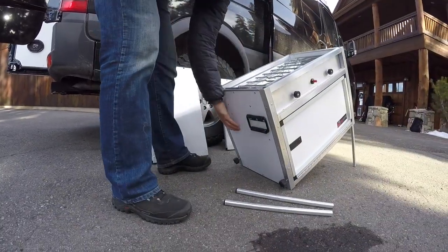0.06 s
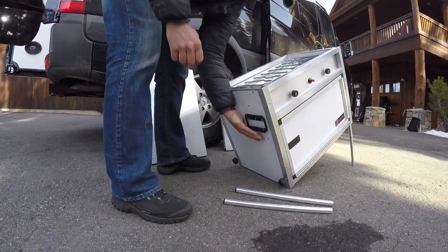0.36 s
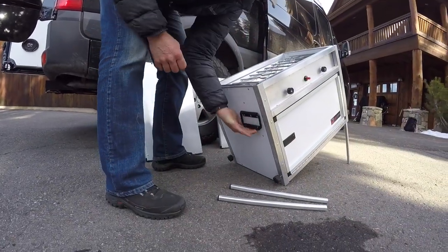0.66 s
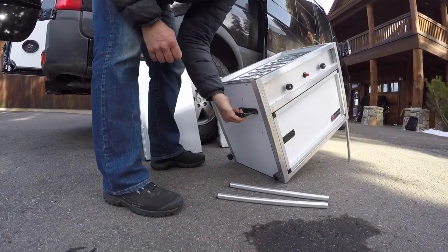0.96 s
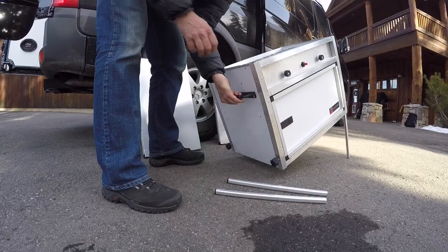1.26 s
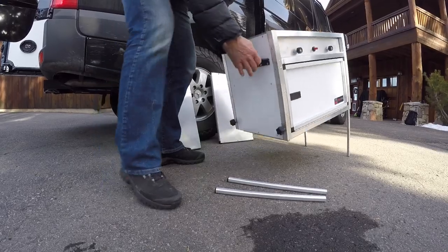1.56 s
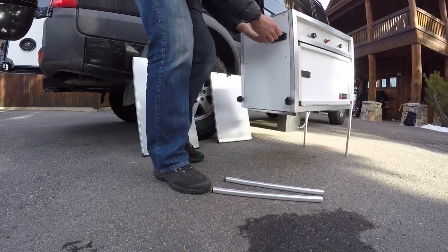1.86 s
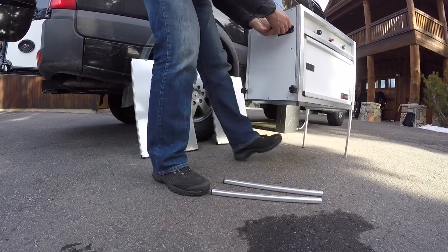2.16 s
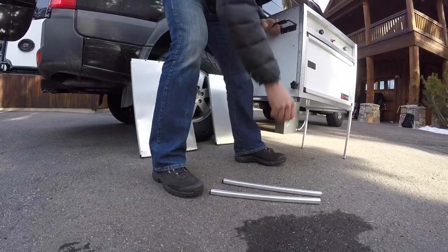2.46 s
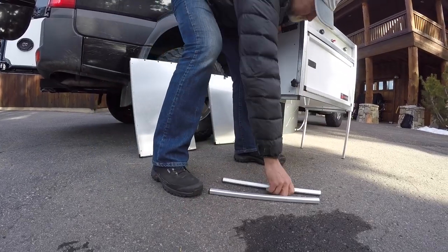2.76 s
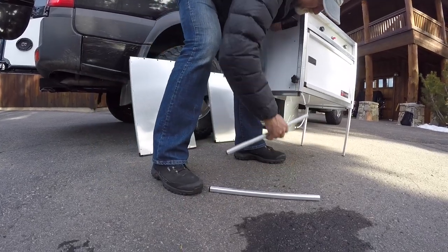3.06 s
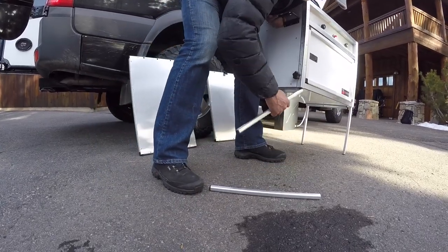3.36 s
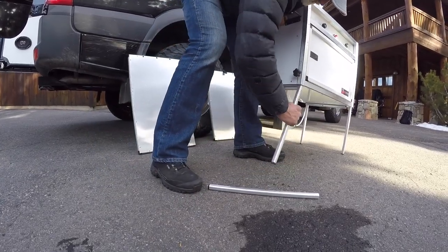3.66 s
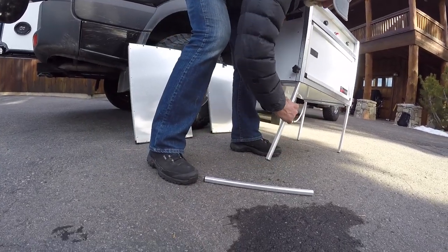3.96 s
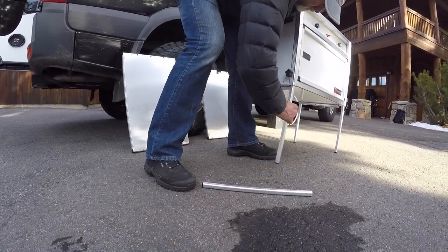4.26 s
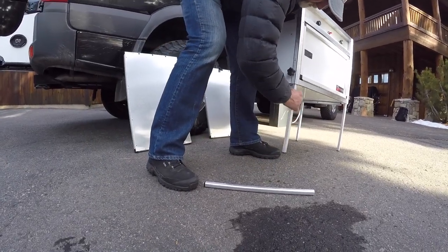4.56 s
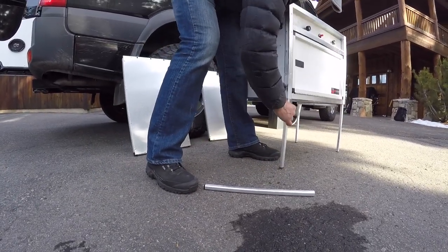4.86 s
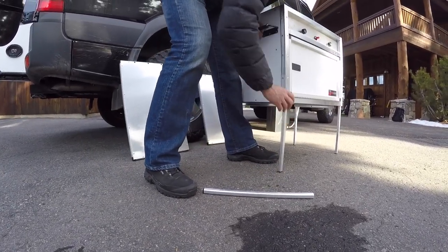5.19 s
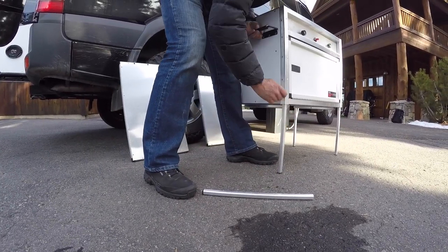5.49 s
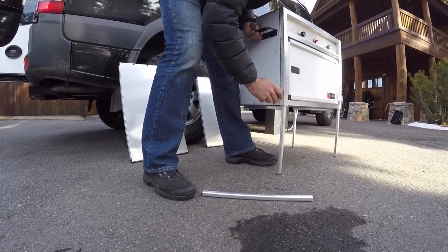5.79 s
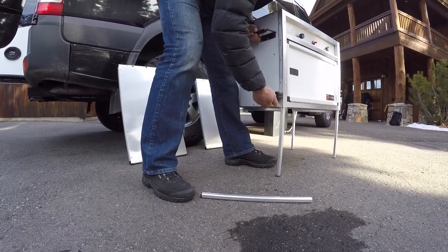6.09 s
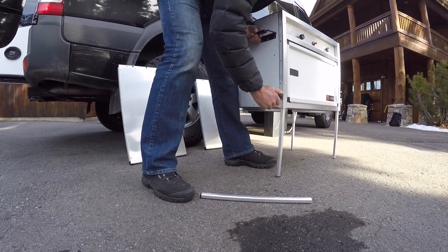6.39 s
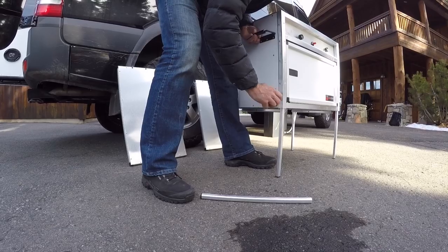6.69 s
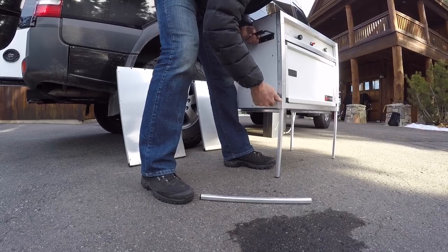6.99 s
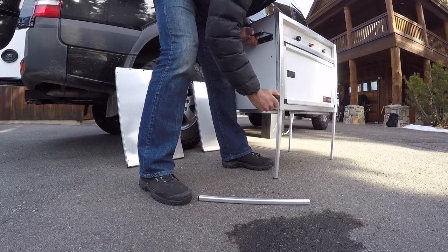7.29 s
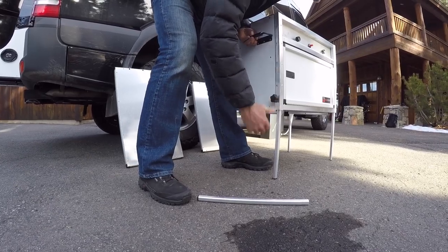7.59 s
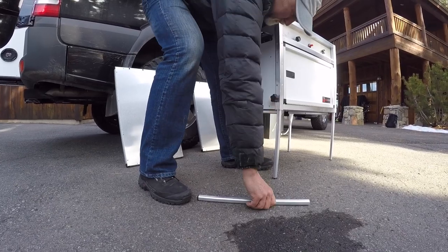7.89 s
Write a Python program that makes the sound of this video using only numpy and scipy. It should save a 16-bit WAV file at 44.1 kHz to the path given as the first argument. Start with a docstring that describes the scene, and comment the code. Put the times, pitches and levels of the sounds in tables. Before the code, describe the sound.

Light wind and the soft swish of a padded jacket run under close metal handling in a paved yard. A hollow metal box knocks, boots step, and an aluminium leg clinks. The leg strikes its socket with a bright clank, then rattles and scrapes in before juddering down on the ground. Quiet ticking and rubbing follow as it is screwed tight, and a second tube clinks faintly at the end.

```python
"""Propping up a sheet-metal camp kitchen

An aluminium leg is picked up, clanks against the underside, scrapes into its socket, is set down on
the pavement and screwed tight. Each blow or scrape is a chattering force that rings the modes of the
hollow box; tube, socket and legs ring with modes of their own. Boots shift, a padded jacket swishes
as grainy noise, and light wind rumbles. The yard adds a thin tail to the blows."""
import sys
import numpy as np
from scipy import signal
from scipy.fft import rfft, irfft
from scipy.io import wavfile

SR = 44100
rng = np.random.default_rng(int(sys.argv[2]) if len(sys.argv) > 2 else 0)


def pcm_store(signal):
    """Save signal as 16-bit PCM."""
    levels = np.round(np.clip(np.atleast_2d(signal), -1, 1) * 32767)
    wavfile.write(sys.argv[1], SR, levels.astype(np.int16).T)


N = 350154
RING_T_S = np.arange(SR * 3 // 5) / SR
ATTACK_S = .04  # rms window that sets a blow's level
TURN_S = 0.5  # one turn of the wrist

# outdoor air and wind: f/Hz, density/dB
AIR_SPECTRUM = [(12, -27.5), (20, -1), (39, -3), (80, -13), (126, -11.5), (225, -21.5), (333, -27.5),
                (372, -26.5), (416, -33.5), (534, -29), (581, -30.5), (767, -31.5), (906, -41), (1500, -51),
                (15500, -55)]
# yard reverberation: f/Hz, t60/s
YARD_DECAY = [(60, 0.23), (300, 0.46), (1000, 0.52), (4000, 0.21), (12000, 0.22)]
# jacket swish: f/Hz, density/dB
JACKET_SPECTRUM = [(300, -8.5), (900, 0.5), (2000, -0.5), (3500, -0.5), (5500, -6), (8000, -14.5),
                   (12000, -24.5), (16000, -31)]
# sleeve hiss: f/Hz, density/dB
SLEEVE_SPECTRUM = [(2000, -24), (6000, 4), (9000, -0.5), (13000, -1), (16000, -5)]
# arm movements: centre t/s, length/s, level/dB
ARM_MOVES = [(.26, 0.75, -57.5), (1.083, 2.26, -58), (1.538, 0.1, -47.5), (1.848, 0.47, -64.5),
             (2.594, 1.3, -56), (3.57, 0.42, -54.5), (4.35, 2.94, -57), (5.55, 0.14, -58), (6.02, .15, -61),
             (6.456, 0.24, -60), (6.813, 0.38, -62), (7.8, 0.4, -54.5)]
# screw thread friction: f/Hz, density/dB
THREAD_SPECTRUM = [(200, -12), (500, 2.5), (850, 3.5), (1120, 4.5), (1500, -13), (2800, -12.5),
                   (3400, -10.5), (4000, -43), (8000, -56)]
# wrist turns that tighten the leg: centre t/s, level/dB
WRIST_TURNS = [(5.3, -57), (6.1, -63.5), (6.869, -58.5), (7.45, -61.5)]
# boots on pavement: t/s, level/dB, push f/Hz, grit re push/dB
STEPS = [(1.433, -59.5, 200.4, 1), (1.696, -50, 323, -7.5), (1.723, -54.5, 510, 2.5),
         (1.745, -41, 201, -14), (1.779, -64.5, 600, 5), (2.197, -40, 146, -12), (2.846, -37.5, 107, -18),
         (2.869, -39, 90, -24)]
# grit under a sole: f/Hz, density/dB
GRIT_SPECTRUM = [(100, -9), (500, 3), (950, -3), (1400, -21), (2200, -14), (6000, -46)]
# frame slipping on its prop: f/Hz, level/dB, t60/s
SQUEAK_MODES = [(4600, 0, .04), (5700, -2.5, 0.045), (7180, 0, .03), (7900, -1, .025), (10150, -4, .02),
                (11330, -5, .035)]
# close clicks and scratches: t/s, length/s, level/dB
DRY_CLICKS = [(0.513, 0.00083, -40.5), (3.669, 0.0027, -43), (3.6748, 0.00093, -33.5), (3.677, 0.02, -42.5),
              (3.693, 0.027, -48.5), (7.498, 0.0023, -42)]
# their broad resonance: f/Hz, density/dB
CLICK_SPECTRUM = [(500, -21), (2400, -14.5), (3900, -0.5), (5200, -10), (7500, -23.5), (15000, -17)]
# foot juddering on pavement: t/s, level/dB
JUDDERS = [(4.846, -46.5), (4.916, -40), (4.956, -28), (5.051, -47.5), (5.162, -49.5)]
# mounted legs under load: f/Hz, level/dB, t60/s
LOADED_LEG_MODES = [(569, -9, 0.26), (818, 4, 0.11), (910, -1.5, 0.21), (917, 1, 0.13), (1156, -20, .2),
                    (1880, -11, 0.19)]
# taps on a leg tube: t/s, level/dB, favoured f/Hz, grip factor on t60
TUBE_TAPS = [(2.767, -50.5, 2400, 0.87), (2.7739, -40, 2310, 0.27), (2.807, -57, 3600, 0.37),
             (2.878, -63, 2500, .8), (3.2295, -28.5, 3400, 0.32), (3.237, -36, 3425, 0.25),
             (7.878, -60, 2370, 0.39), (7.896, -52.5, 2000, 0.2), (7.904, -53, 6000, 0.67),
             (7.922, -48, 2650, 0.63)]
# tube bending modes: f/Hz, level/dB, t60 before grip/s
TUBE_MODES = [(1828, 0, .19), (3435, 0, .15), (5330, -5, .11), (7720, -13, .09)]
# gritty contact on the tube: f/Hz, density/dB
TUBE_CRACK = [(100, -13.5), (600, 4.5), (2000, -1.5), (5000, -6), (7500, -25.5), (14000, -36)]
# leg rim on socket: t/s, level/dB, favoured f/Hz
RIM_STRIKES = [(3.362, -19, 3700), (3.399, -36, 3000), (3.892, -40, 2850), (4.114, -47.5, 2500),
               (4.16, -47.5, 2600), (4.512, -48, 3800)]
# metal socket: f/Hz, level/dB, t60/s
SOCKET_MODES = [(2306, -4.5, 0.038), (2660, 0, .04), (2820, 0.5, .04), (3180, -14, 0.075), (3430, 1, 0.025),
                (3700, -4, 0.035), (4520, -13, .07), (4700, -8.5, 0.033), (5240, -2.5, 0.045),
                (5500, -3.5, 0.063), (6100, -21.5, .08), (8020, -22, 0.06)]
# hard contact of the rim: f/Hz, density/dB
RIM_CRACK = [(500, -21), (2700, 1), (5500, -3), (9000, -16), (16000, -19.5)]
# main modes of the box: f/Hz, level/dB, t60/s
BOX_MODES = [(47.6, 0.5, 0.2), (73.4, -2, 0.39), (111.44, -1.5, 0.73), (117, -5, 0.27), (166.4, 3, 0.082),
             (180.75, 3.5, 0.44), (265.7, -4, 0.35), (292, -9.5, 0.31), (459, -19.5, 0.21),
             (594, -9.5, 0.31), (620.5, -10, 0.12), (660, -13, .18), (727, -9.5, 0.22), (972.6, 0, 0.11),
             (1030, -10, 0.099), (1089, -6, 0.13), (1215, -9, 0.16), (1340, -11, .1), (1432, -7.5, 0.093),
             (1685, -11, 0.063), (1996, -8, .08)]
# dense panel modes: f/Hz, density/dB
PANEL_SPECTRUM = [(30, 6), (110, 8.5), (175, 9), (225, 3), (280, 4), (350, -3.5), (450, -6), (620, 3),
                  (1100, -1.5), (2000, -3), (3200, -5.5), (5000, -14), (7500, -20), (16000, -38.5)]
# their decay: f/Hz, t60/s
PANEL_DECAY = [(40, 0.37), (200, .3), (500, 0.16), (1200, 0.079), (3000, 0.061), (7000, 0.04),
               (15000, 0.021)]
# near-field peak and dips of the box: f/Hz, width/Hz, gain/dB
NEAR_FIELD_BANDS = [(174, 41, 2.5), (206, 34, -6), (383.6, 69, -2.5)]
# box registers (thump, boom, clang, clank, sizzle): low f/Hz, high f/Hz
REGISTERS = [(30, 100), (100, 380), (380, 1400), (1400, 6000), (6000, 15000)]
# handle, latch and thread ticks: t/s, level/dB, hardness (clank re clang)/dB
TICKS = [(.145, -70.5, 22), (.221, -57.5, -10.5), (0.688, -62, 16), (.777, -54.5, -3), (.806, -58, 2),
         (.845, -53, 2), (.859, -50.5, -6), (5.297, -61.5, -11), (5.365, -57.5, -9), (6.056, -59, -5.5),
         (6.19, -64, -14), (6.211, -62, -7), (6.44, -64, -5), (6.883, -59.5, -12), (6.916, -61, -2),
         (7.373, -66, 5)]
# metal dragged on metal or pavement: t/s, length/s, level/dB, hardness/dB, weight/dB, favoured f/Hz
SCRAPES = [(4.123, .028, -42, -16.5, 3, 700), (4.172, 0.021, -45, -21, 0, 940),
           (4.449, .026, -41.5, 4.5, 8, 620), (4.475, .034, -35, -4.5, 0, 166),
           (4.586, 0.047, -57.5, 0, 7, 1300), (4.926, 0.028, -34.5, -9.5, 6.5, 170),
           (4.976, 0.083, -48, 0, 1, 905)]
# blows on the box: t/s, contact/s, level/dB, hardness/dB, weight/dB, favoured f/Hz
KNOCKS = [(0.5523, 0.004, -34.5, -8, -32, 1040), (.874, 0.004, -35, -3, 0, 42),
          (0.926, .002, -46, -13.5, 15, 42), (1.001, .006, -43.5, -12, 14.5, 644),
          (1.017, .0055, -33.5, -5, 5.5, 48), (2.04, 0.0051, -37.5, -11.5, -8, 860),
          (2.064, .0064, -47, -6, -9, 617), (3.229, .02, -32, -9.5, -16, 1160),
          (3.361, 0.0032, -35.5, 9.5, -12, 267), (3.393, 0.0041, -36, 6.5, -2.5, 1260),
          (3.399, 0.0032, -38, -9.5, -4, 1320), (3.892, 0.0028, -39, 5.5, -25, 1490),
          (4.112, 0.0056, -41.5, -5, -20, 850), (4.163, 0.0058, -47, -0.5, -4, 620),
          (4.215, 0.0081, -46.5, -20.5, -7, 620), (4.26, .009, -52.5, -21, 17, 48),
          (4.332, 0.0093, -43, -11, 3, 1490), (4.378, 0.0051, -52.5, -13, 18.5, 48),
          (4.428, .004, -50, -23, 19.5, 620), (4.512, 0.0098, -26, -4.5, -8, 766),
          (4.669, 0.016, -49.5, -4, -10, 2580), (4.846, 0.0042, -47, -9.5, 0, 930),
          (4.909, 0.015, -30.5, -11.5, 9.5, 170), (4.955, 0.026, -34, -6, 4.5, 900),
          (5.048, 0.0093, -47, -11, 16, 620), (5.158, 0.0044, -51, -11.5, -7, 890),
          (5.187, 0.0072, -54.5, -13, 8, 111)]


def amp(db):
    """Decibels to gain."""
    return 10 ** (np.asarray(db) / 20)


def unit_rms(x, head_s=None):
    """Scales x to rms 1 over its head, or over all of it."""
    head = x if head_s is None else x[:round(head_s * SR)]
    return x / np.sqrt(np.mean(head ** 2) + 1e-20)


def lookup(table, hz):
    """Interpolates a table over log frequency."""
    table_hz, value = np.transpose(table)
    return np.interp(np.log(hz + 1), np.log(table_hz + 1), value)


def add(mix, t_s, sound):
    """Mixes a sound in at t_s."""
    part = mix[max(round(t_s * SR), 0):][:len(sound)]
    part += sound[:len(part)]


def coloured(x, spectrum):
    """Filters x by a spectrum table; rms 1."""
    gain = amp(lookup(spectrum, np.fft.rfftfreq(len(x), 1 / SR)))
    return unit_rms(irfft(rfft(x) * gain, len(x)))


def noise(spectrum, count=len(RING_T_S)):
    """Coloured noise; rms 1."""
    return coloured(rng.standard_normal(count), spectrum)


def wander(rate_hz):
    """Random drift below about rate_hz; rms 1."""
    hz = np.fft.rfftfreq(N, 1 / SR)
    return unit_rms(irfft(rfft(rng.standard_normal(N)) * np.exp(-(hz / rate_hz) ** 2), N))


def swell(centre_s, length_s, db):
    """One cosine arch of gain."""
    return amp(db) * np.cos(np.pi * np.clip((np.arange(N) / SR - centre_s) / length_s, -.5, .5))


def stroke(start_s, length_s, db, attack_s, release_s):
    """Trapezoid of gain."""
    t_s = np.arange(N) / SR - start_s
    return amp(db) * np.clip(np.minimum(t_s / attack_s, (length_s - t_s) / release_s), 0, 1)


def decayed(x, decay_table):
    """Decays each frequency of x at its own t60."""
    hz, t_s, bins = signal.stft(x, SR, nperseg=256)
    fade = np.exp(-np.log(1000) * t_s / lookup(decay_table, hz)[:, None])
    return signal.istft(bins * fade, SR, nperseg=256)[1][:len(x)]


def modes(table, scatter_db=0, t60_scale=1):
    """Damped sines of random sign, levels scattered by scatter_db."""
    hz, db, t60_s = np.transpose(table)[:, :, None]
    gain = amp(db + scatter_db * rng.standard_normal(db.shape)) * rng.choice([-1, 1], db.shape)
    fade = np.exp(-np.log(1000) * RING_T_S / (t60_s * t60_scale))
    return (gain * fade * np.sin(2 * np.pi * hz * RING_T_S)).sum(0)


def favouring(table, favoured_hz, db_per_octave):
    """The strike point weakens modes far from favoured_hz."""
    return [(hz, db - db_per_octave * abs(np.log2(hz / favoured_hz)), t60_s) for hz, db, t60_s in table]


def chatter(length_s, slips_per_s, fade_nepers):
    """Contact force: a first touch, then fading random slips and rebounds."""
    slips = rng.standard_normal(SR // 10) * (rng.random(SR // 10) < slips_per_s / SR)
    count = int(np.clip(length_s * SR, 2, SR // 10))
    force = slips[:count] * np.exp(-fade_nepers * np.arange(count) / count)
    force[0] = 0.58
    return force


def friction(spectrum, grain_db, grain_hz):
    """Rubbing: noise with a fast random flutter in level."""
    return coloured(rng.standard_normal(N) * amp(grain_db * wander(grain_hz)), spectrum)


def air(level_db=-44, wind_below_hz=180, hum_hz=387):
    """Steady hiss, gusty bass wind and a far, wavering hum that swells and passes."""
    wash = noise(AIR_SPECTRUM, N)
    wind = signal.sosfiltfilt(signal.butter(2, wind_below_hz, fs=SR, output="sos"), wash)
    hiss = wash - wind
    hum_cycles = np.cumsum(hum_hz * (1 + .008 * wander(7.07))) / SR
    hum = unit_rms(np.sin(2 * np.pi * hum_cycles) * amp(3.2 * wander(6.8)))
    gusts = wind * amp(3.2 * wander(4.8))
    return amp(level_db) * (hiss + gusts) + hum * swell(centre_s=6.9, length_s=3.25, db=-64.5)


def yard_echo(x, level_db=-18.5, build_s=0.0072):
    """Car, pavement and house front scatter a thin tail."""
    tail = decayed(rng.standard_normal(len(RING_T_S)), YARD_DECAY)
    tail *= 1 - np.exp(-(RING_T_S / build_s) ** 2)
    return amp(level_db) * signal.fftconvolve(x, tail / np.linalg.norm(tail))[:N]


def jacket(rest_db=-64):
    """Fabric rubs as the arms move; a sleeve hisses as it straightens."""
    motion = np.sqrt(amp(rest_db) ** 2 + sum(swell(*move) ** 2 for move in ARM_MOVES))
    swish = friction(JACKET_SPECTRUM, grain_db=1.4, grain_hz=60) * motion
    slide = stroke(start_s=-0.26, length_s=0.94, db=-63, attack_s=0.34, release_s=0.3)
    return swish + friction(SLEEVE_SPECTRUM, grain_db=1.7, grain_hz=51) * slide


def thread_rub():
    """The screw thread rubs during each turn."""
    motion = sum(swell(centre_s, TURN_S, db) for centre_s, db in WRIST_TURNS)
    return friction(THREAD_SPECTRUM, grain_db=2.5, grain_hz=44) * motion


def thread_catches(per_turn=6, db=-70.5, spread_db=3, hardness_db=-3):
    """The thread catches at random in each turn; rows as in TICKS."""
    return [(centre_s + TURN_S * (rng.random() - .5), db + spread_db * rng.standard_normal(), hardness_db)
            for centre_s, _ in WRIST_TURNS for _ in range(per_turn)]


def steps(decay_cycles=.45, grit_s=0.005):
    """A rubber sole gives a dull push and a puff of crushed grit."""
    out = np.zeros(N)
    for t_s, db, hz, grit_db in STEPS:
        cycles = hz * RING_T_S
        push = unit_rms(np.sin(2 * np.pi * cycles) * cycles * np.exp(-cycles / decay_cycles), ATTACK_S)
        grit = unit_rms(noise(GRIT_SPECTRUM) * np.exp(-RING_T_S / grit_s), ATTACK_S)
        add(out, t_s, amp(db) * (push + amp(grit_db) * grit))
    return out


def squeak(t_s=2.065, length_s=0.036, db=-52.5):
    """The frame settles on its prop; quick slips excite its highest modes."""
    out = np.zeros(N)
    ring = signal.fftconvolve(modes(SQUEAK_MODES), chatter(length_s, slips_per_s=1300, fade_nepers=.3))
    add(out, t_s, amp(db) * unit_rms(ring, ATTACK_S))
    return out


def dry_clicks():
    """Tiny slips as short noise bursts, too close to carry an echo."""
    out = np.zeros(N)
    for t_s, length_s, db in DRY_CLICKS:
        burst = noise(CLICK_SPECTRUM, SR // 10)[:int(length_s * SR)]
        add(out, t_s, amp(db) * burst * signal.windows.tukey(len(burst), .3))
    return out


def judders():
    """A foot catches and slips, shaking the loaded legs."""
    out = np.zeros(N)
    for t_s, db in JUDDERS:
        ring = modes(LOADED_LEG_MODES, scatter_db=1.5)
        force = chatter(length_s=0.0026, slips_per_s=400, fade_nepers=3.5)
        add(out, t_s, amp(db) * unit_rms(signal.fftconvolve(ring, force), ATTACK_S))
    return out


def tube_taps(crack_db=4, crack_s=.0022):
    """A struck tube rings, damped by the hand; grit adds a crack."""
    out = np.zeros(N)
    for t_s, db, favoured_hz, grip in TUBE_TAPS:
        ring = modes(favouring(TUBE_MODES, favoured_hz, db_per_octave=12), t60_scale=grip)
        crack = amp(crack_db) * noise(TUBE_CRACK) * np.exp(-RING_T_S / crack_s)
        add(out, t_s, amp(db) * unit_rms(unit_rms(ring, head_s=.005) + crack, ATTACK_S))
    return out


def rim_strikes(crack_db=12.5, crack_s=0.0021, contact_s=0.0061, rise_s=0.00086):
    """The rim hits the socket: bright crack, loud contact, short ring."""
    out = np.zeros(N)
    for t_s, db, favoured_hz in RIM_STRIKES:
        ring = unit_rms(modes(favouring(SOCKET_MODES, favoured_hz, db_per_octave=9)), ATTACK_S)
        ring *= 1 + 2.63 * np.exp(-(RING_T_S / contact_s) ** 2)
        crack = amp(crack_db) * noise(RIM_CRACK) * np.exp(-RING_T_S / crack_s)
        onset = 1 - np.exp(-RING_T_S / rise_s)
        add(out, t_s, amp(db) * unit_rms((ring + crack) * onset, ATTACK_S))
    return out


def near_field(x):
    """Panels and their mirror image in the pavement add in one bass band and cancel above it."""
    for hz, width_hz, db in NEAR_FIELD_BANDS:
        x = x + (amp(db) - 1) * signal.lfilter(*signal.iirpeak(hz, hz / width_hz, SR), x)
    return x


def strike_point(x, favoured_hz, lift_db=9, q=3, decay_cycles=14.4):
    """The strike point lifts one band until the vibration has spread over the panels."""
    band = signal.lfilter(*signal.iirpeak(favoured_hz, q, SR), x)
    return x + (amp(lift_db) - 1) * band * np.exp(-RING_T_S * favoured_hz / decay_cycles)


def box(force, levels_db, modes_db):
    """A force rings the main and dense modes; the top len(levels_db) registers sound."""
    dense = unit_rms(decayed(noise(PANEL_SPECTRUM), PANEL_DECAY), ATTACK_S)
    ring = dense + amp(modes_db) * unit_rms(modes(BOX_MODES, scatter_db=0.5), ATTACK_S)
    response = near_field(signal.fftconvolve(ring, force)[:len(ring)])
    out = np.zeros(len(ring))
    for edges_hz, db in zip(REGISTERS[-len(levels_db):], levels_db):
        band = signal.sosfilt(signal.butter(4, edges_hz, "band", fs=SR, output="sos"), response)
        out += amp(db) * unit_rms(band, ATTACK_S + len(force) / SR)
    return out


def box_contacts(table, slips_per_s, fade_nepers, modes_db):
    """Contacts drive the box: hardness trades boom for clank, weight sets the thump."""
    out = np.zeros(N)
    for t_s, length_s, db, hardness_db, weight_db, favoured_hz in table:
        boom_db, clank_db = db - hardness_db / 2, db + hardness_db / 2
        thump_db, clang_db, sizzle_db = db + weight_db, db - 3.5, clank_db - 17.5
        force = chatter(length_s, slips_per_s, fade_nepers)
        ring = box(force, (thump_db, boom_db, clang_db, clank_db, sizzle_db), modes_db)
        add(out, t_s, strike_point(ring, favoured_hz))
    return out


def ticks():
    """Light parts touch the panels too briefly to move the whole box."""
    out = np.zeros(N)
    for t_s, db, hardness_db in TICKS + thread_catches():
        clang_db, clank_db = db - hardness_db / 2, db + hardness_db / 2
        sizzle_db = clank_db - 15
        force = chatter(length_s=.002, slips_per_s=1200, fade_nepers=2)
        add(out, t_s, box(force, (clang_db, clank_db, sizzle_db), modes_db=-2))
    return out


def scrapes():
    """Stick-slip keeps feeding the box while the leg is dragged."""
    return box_contacts(SCRAPES, slips_per_s=3500, fade_nepers=0.37, modes_db=-14.5)


def knocks():
    """Blows rattle the loose panels and the hollow box booms."""
    return box_contacts(KNOCKS, slips_per_s=3000, fade_nepers=1, modes_db=-4.5)


def scene():
    """Metalwork and boots in the yard, over friction and air; mono."""
    blows = knocks() + scrapes() + ticks() + rim_strikes() + tube_taps() + judders() + squeak() + steps()
    return (blows + yard_echo(blows) + dry_clicks() + jacket() + thread_rub() + air())[None]


def record(dry):
    """Clips at full scale, then low-passes."""
    cutoff_hz = 15400
    lowpass = signal.firwin(401, cutoff_hz, window=("kaiser", 8), fs=SR)
    return signal.oaconvolve(np.clip(dry, -1, 1), lowpass[None], "same")


dry = scene()
out = record(dry)
pcm_store(out)
```